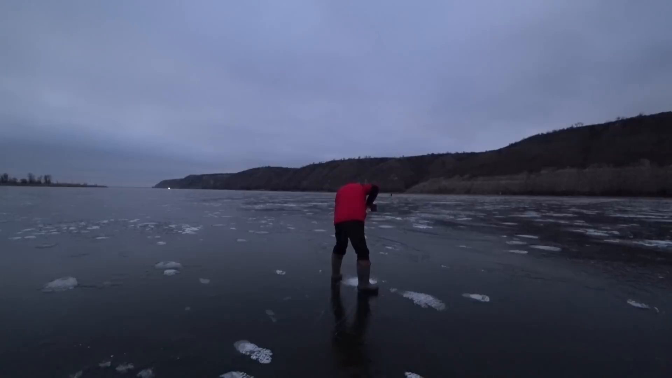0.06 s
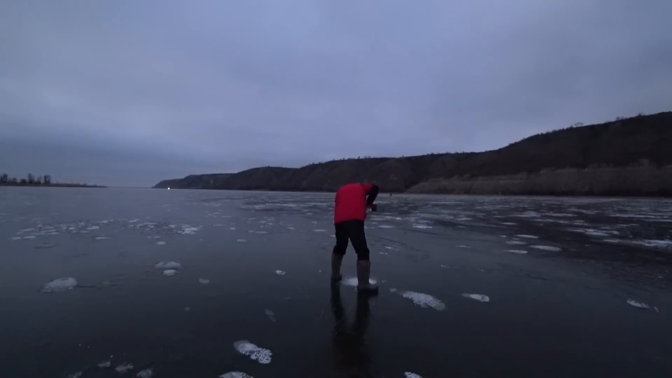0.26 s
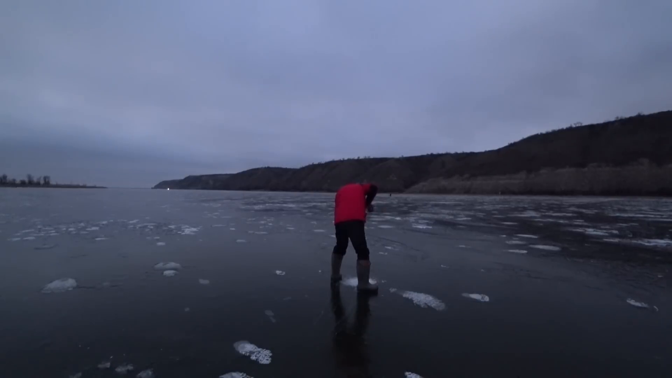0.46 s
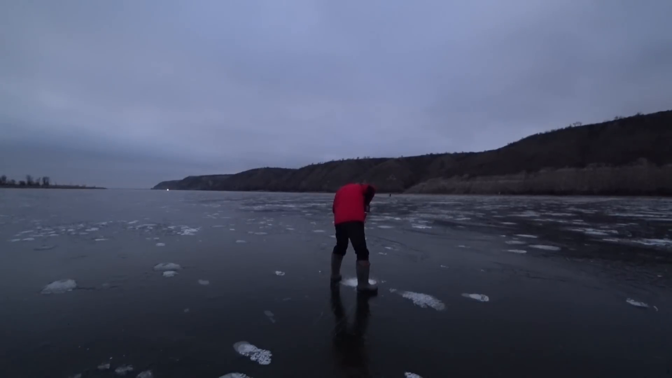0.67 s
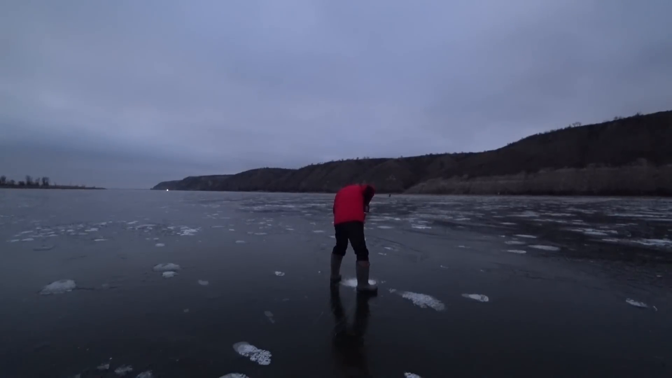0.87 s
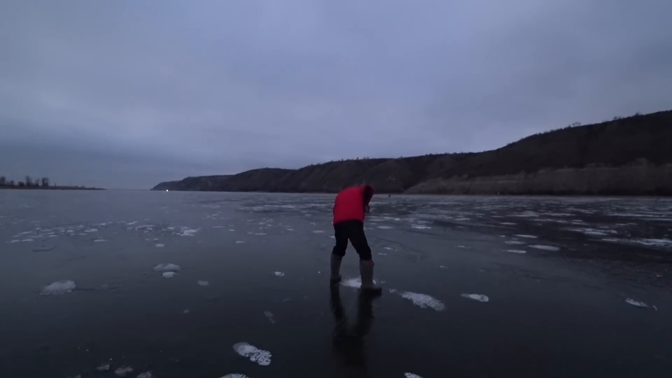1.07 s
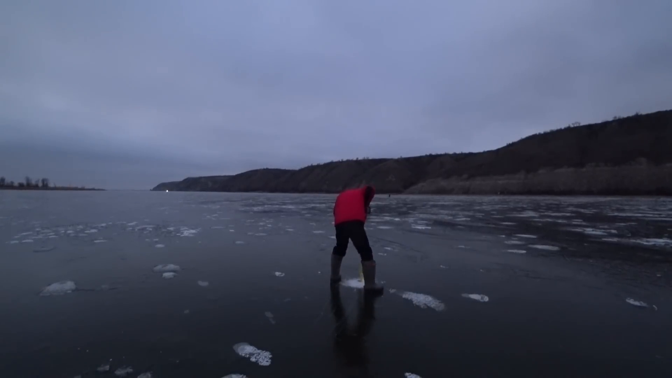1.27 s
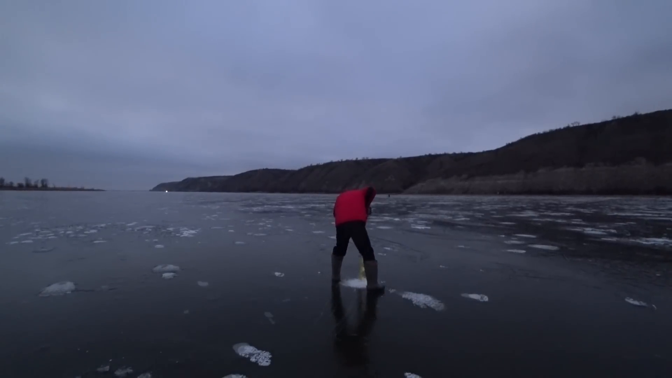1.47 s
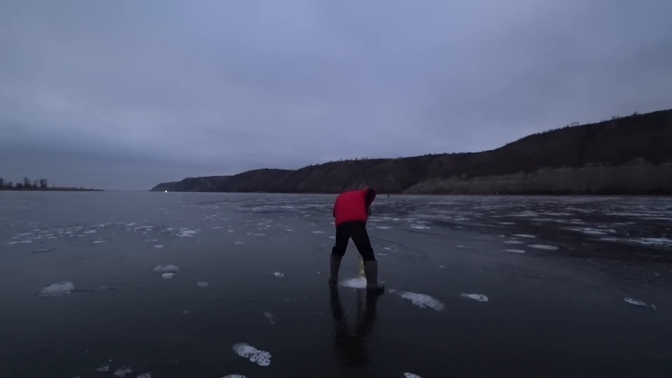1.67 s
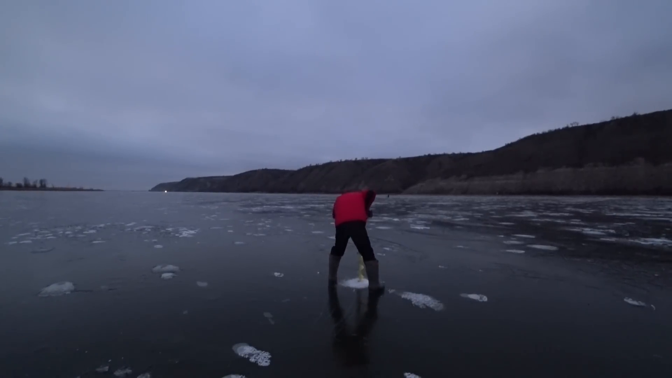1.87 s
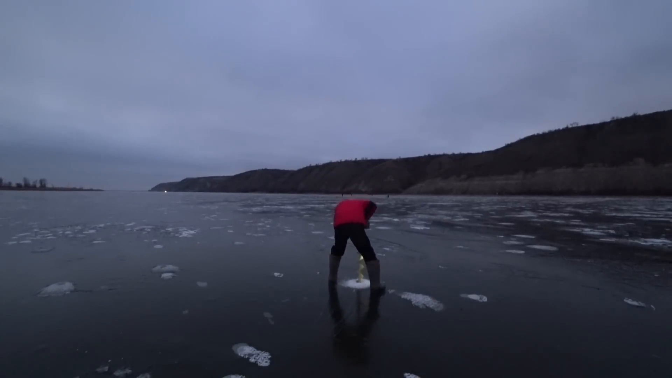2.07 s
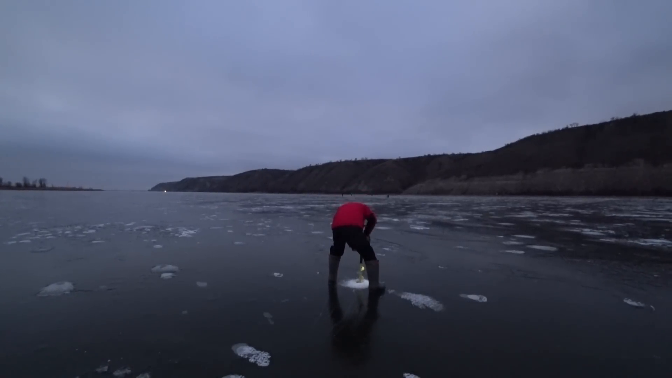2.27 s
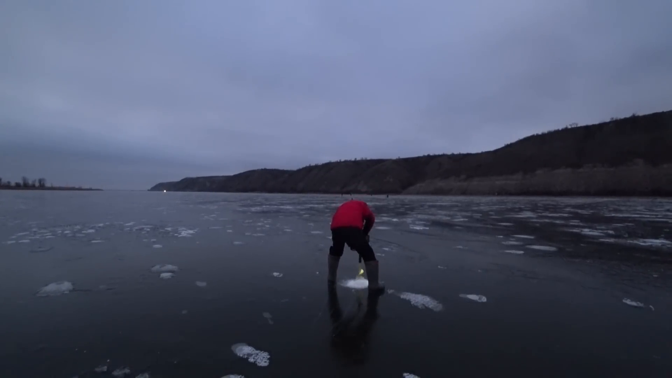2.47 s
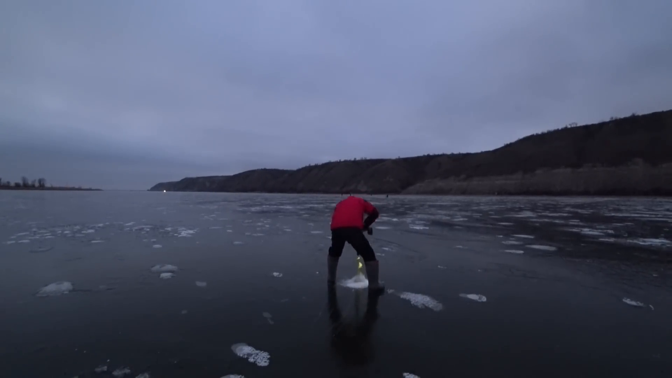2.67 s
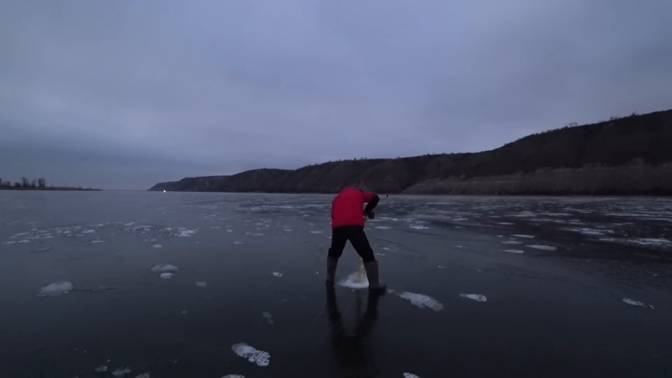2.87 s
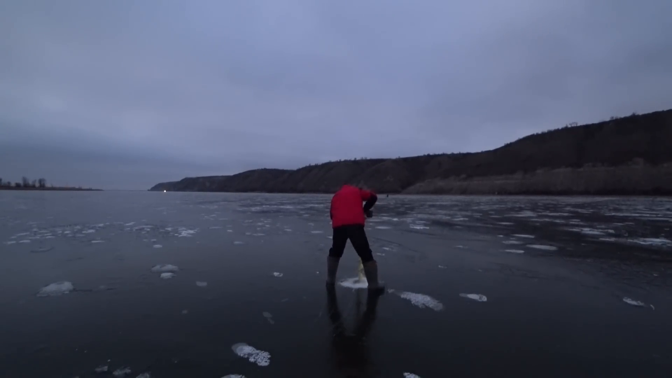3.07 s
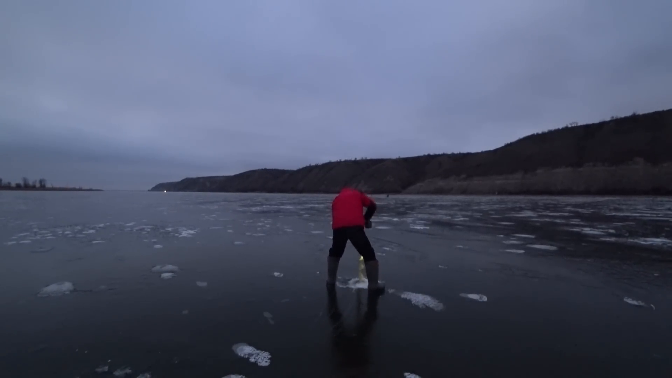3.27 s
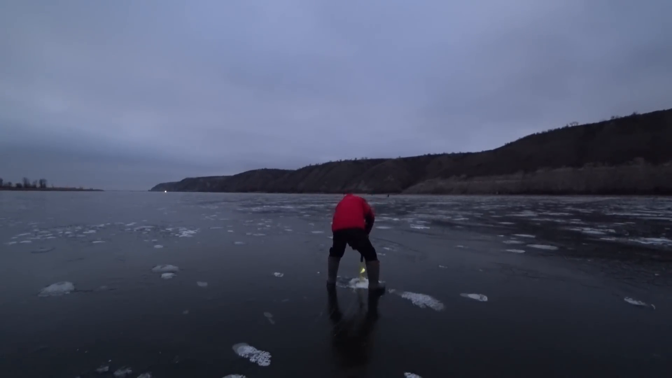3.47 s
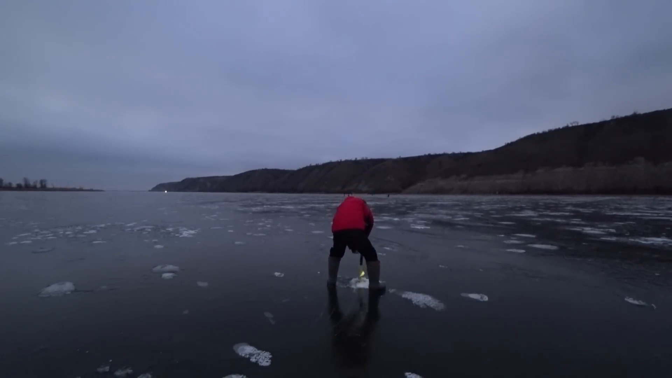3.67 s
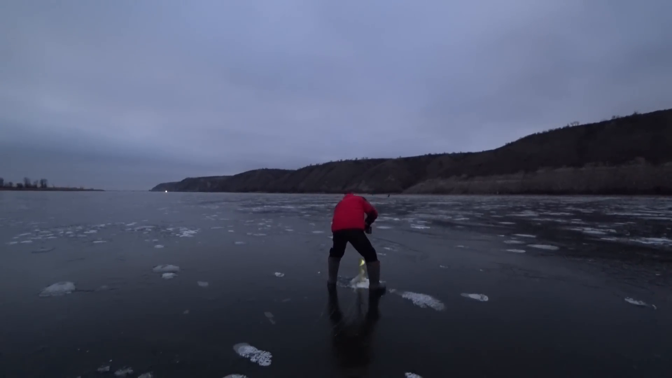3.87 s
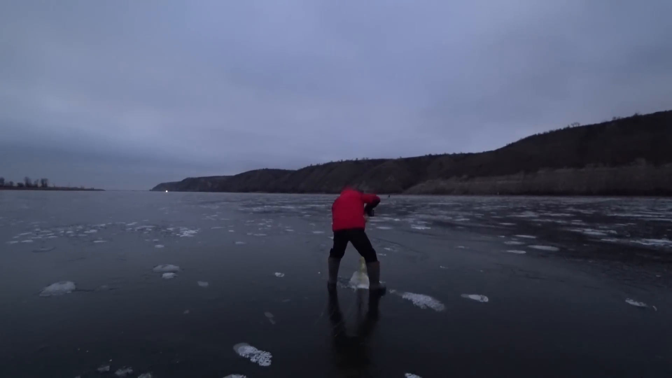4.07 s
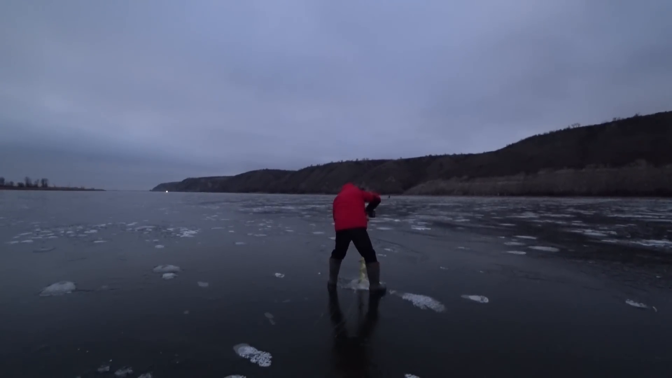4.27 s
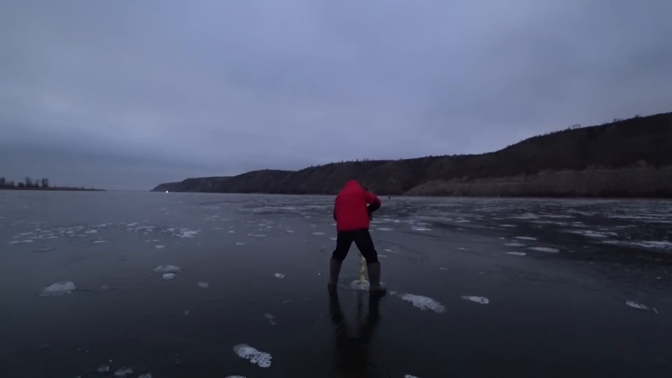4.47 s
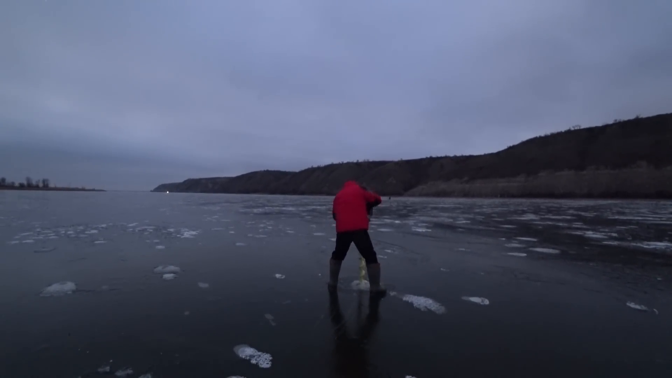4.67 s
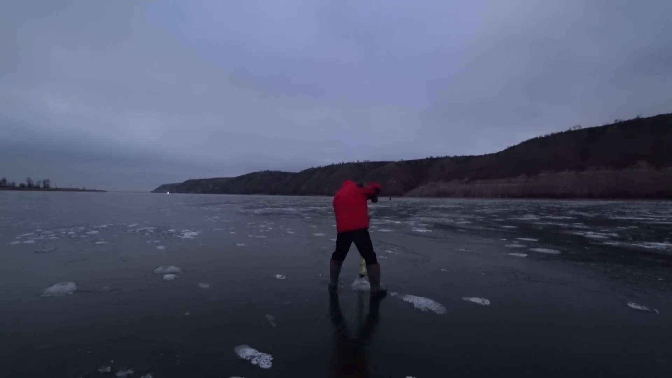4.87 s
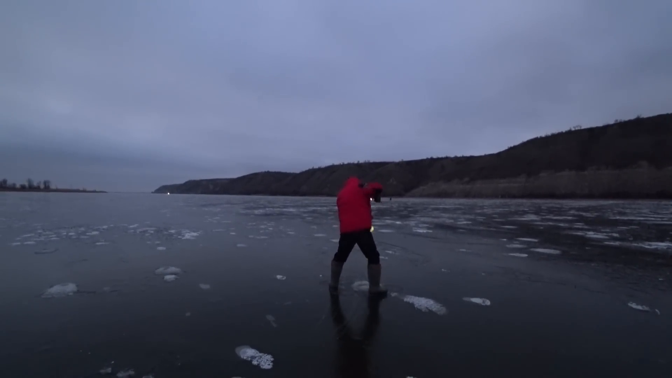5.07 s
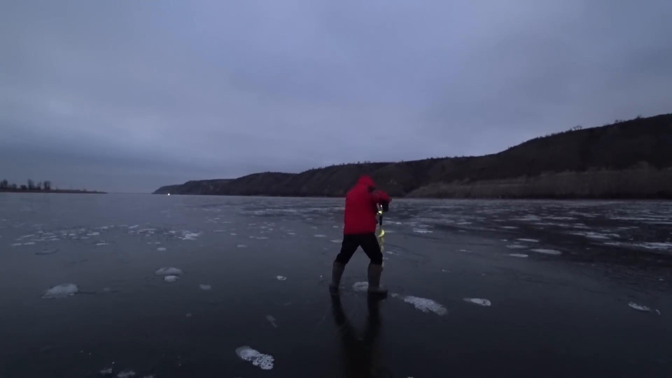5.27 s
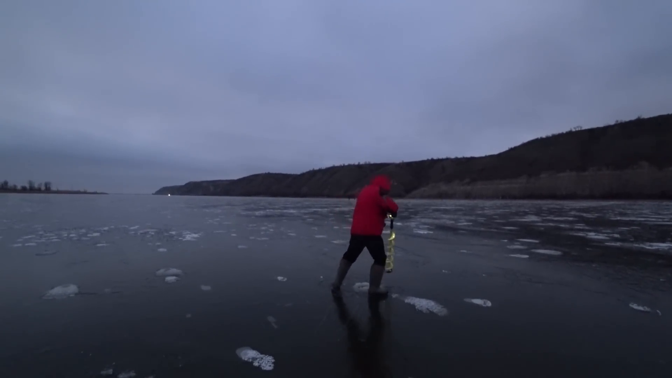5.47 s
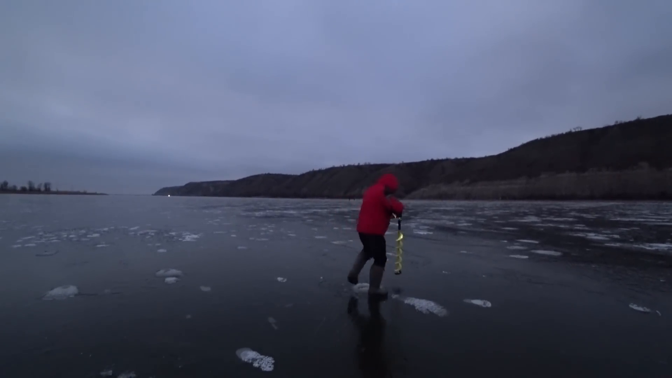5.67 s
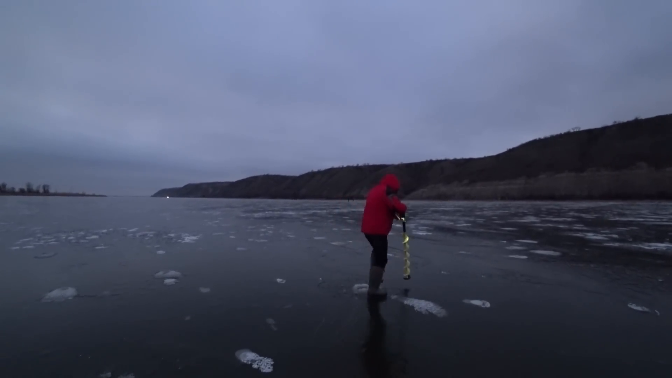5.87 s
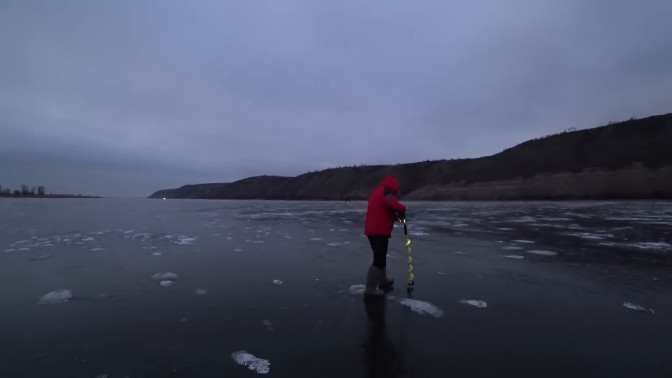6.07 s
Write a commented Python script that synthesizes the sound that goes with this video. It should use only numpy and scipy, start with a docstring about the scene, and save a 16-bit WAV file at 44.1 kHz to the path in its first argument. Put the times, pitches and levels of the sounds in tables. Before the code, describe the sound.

A hand auger scrapes, squeals and crunches through thick ice, then breaks into gulping water and slush, outdoors in still air.

```python
"""A hand auger (a big spiral drill) bores through thick river ice, a few metres away in still open air.
First the blades shave with a gritty hiss, whistling and squealing as they stick and slip, while boots
and the shaft knock. From about 2.4 s the blades catch and crack out chips, the spiral stirs slush, and
water gulps in the hole as the auger breaks through. It is pulled up at about 4.6 s. Afterwards drips
and boots tick faintly on the ice and a jacket rustles."""
import sys
import numpy as np
from scipy import signal
from scipy.fft import rfft, irfft, next_fast_len
from scipy.io import wavfile
from scipy.ndimage import uniform_filter1d

SR = 44100
rng = np.random.default_rng(int(sys.argv[2]) if len(sys.argv) > 2 else 0)


def unload_wav(signal):
    """Save mono or channel-first audio to the path in sys.argv[1] as 16-bit WAV at rate SR, clipped to [-1, 1]."""
    wavfile.write(
        sys.argv[1],
        SR,
        np.round(np.clip(np.atleast_2d(signal).T, -1, 1) * 32767).astype(np.int16),
    )


N = 270323
TIME = np.arange(N) / SR


def amp(db):
    """Turns decibels into a number to multiply by."""
    return 10 ** (np.asarray(db) / 20)


def unit(x):
    """Scales a signal to an average (rms) size of one."""
    return x / np.sqrt(np.mean(x ** 2) + 1e-20)


def level_at(points, hz):
    """Reads levels between (pitch_hz, level_db) points, on a musical pitch scale."""
    pitches, levels = np.transpose(points)
    return np.interp(np.log(hz + 1), np.log(pitches + 1), levels)


def follow(rows):
    """Joins rows of (time_s, values...) into one curve for each value."""
    times, *columns = np.transpose(rows)
    return [np.interp(TIME, times, column) for column in columns]


def during(rows):
    """One from the first row's time to the last, zero outside, with soft edges."""
    return uniform_filter1d(1. * ((TIME >= rows[0][0]) & (TIME <= rows[-1][0])), size=400)


def swell(start_s, rise_s, length_s, fade_s):
    """Loudness of one movement: it builds up, holds, and dies away when its length is over."""
    t = TIME - start_s
    return np.clip(t / rise_s, 0, 1) ** 1.36 * np.exp(-np.maximum(t - length_s, 0) / fade_s)


def together(levels):
    """Adds the levels of overlapping movements by power."""
    return np.sqrt(sum(level ** 2 for level in levels))


def add(mix, start_s, sound):
    """Mixes a sound in at a given time."""
    part = mix[max(round(start_s * SR), 0):][:len(sound)]
    part += sound[:len(part)]


def band(x, hz, kind, order=3):
    """Keeps the low, the high or a middle band of a sound."""
    return signal.sosfilt(signal.butter(order, hz, kind, fs=SR, output="sos"), x)


def colour(x, points):
    """Shapes the tone by (pitch_hz, level_db) points; clicks keep their sharp front."""
    log_gain = np.log(amp(level_at(points, abs(np.fft.fftfreq(4096, 1 / SR)))))
    response = np.exp(np.conj(signal.hilbert(log_gain)))  # rings only after a click, never before
    taps = np.fft.ifft(response).real
    return signal.oaconvolve(x, taps[:len(taps) // 2])[:N]


def resonate(x, hz, width_hz):
    """Makes a sound ring at a steady or sliding pitch; a narrower width rings longer."""
    turn = np.exp(2j * np.pi * np.cumsum(hz * np.ones(len(x))) / SR)
    decay = np.exp(-np.pi * width_hz / SR)
    return 2 * (turn * signal.lfilter([1 - decay], [1, -decay], x / turn)).real


def wander(rate_hz):
    """A smooth random wobble, mostly slower than the given rate."""
    size = next_fast_len(N, real=True)
    hz = np.fft.rfftfreq(size, 1 / SR)
    spectrum = rfft(rng.standard_normal(size)) * np.exp(-(hz / rate_hz) ** 2)
    return unit(irfft(spectrum, size)[:N])


def grit(per_s, spread_db):
    """Tiny cracks: random clicks, a few louder than the rest."""
    size = amp(spread_db * np.minimum(rng.exponential(1, N), 4))
    return unit(size * rng.choice([-1, 1], N) * (rng.random(N) < per_s / SR))


def patchy(x, depth_db, size=1024):
    """Every flake of ice favours its own few pitches for a moment."""
    frames = dict(nperseg=size, noverlap=size * 3 // 4)
    spectra = signal.stft(x, **frames)[2]
    patches = uniform_filter1d(rng.standard_normal(spectra.shape), size=4, axis=0)  # smooth over pitch
    patches = unit(uniform_filter1d(patches, size=5, axis=1))  # and over time
    return unit(signal.istft(spectra * amp(depth_db * patches), **frames)[1][:N])


def air(level_db=-54.5, left_db=-1.7):
    """The steady hush of the open river, wide and a little to the right."""
    # tone of the hush: pitch_hz, level_db
    hush_tone = [(15, -33), (25, -18), (108, -10), (293, 2), (754, 0), (962, 2), (1480, 0), (1790, -7.5),
                 (2160, -7.5), (3250, -12), (6920, -7.5), (9320, -20.5), (12200, -16), (14800, -25),
                 (16000, -65)]
    # how much the two ears differ: pitch_hz, side_level_db
    width = [(100, -21), (1200, -1), (1900, 3), (3500, -3), (7000, -2.5), (13000, -7)]
    mid, side = (unit(colour(rng.standard_normal(N), hush_tone)) for _ in range(2))
    side = colour(side, width)
    return amp(level_db) * np.array([amp(left_db) * (mid + side), mid - side])


def crank_pressure():
    """Each push on the crank swells two loudness curves: hiss and low grinding."""
    # pushes: start_s, rise_s, length_s, fade_s, hiss_db, grind_db
    strokes = [(-.03, 0.076, 0.1, 0.011, -26, -31), (0.086, 0.16, 0.17, .02, -50.5, -45),
               (0.238, 0.033, .17, 0.054, -30.5, -33), (0.51, 0.092, 0.095, 0.051, -41.5, -37),
               (0.675, 0.1, 0.091, 0.011, -37, -42), (0.778, 0.022, 0.025, 0.038, -37, -43),
               (1.025, 0.095, 0.95, 0.013, -23, -32.5), (1.972, 0.043, 0.076, 0.023, -35, -42.5),
               (2.038, 0.065, .38, 0.033, -43.5, -53.5), (2.414, 0.063, 0.057, 0.016, -37, -39)]
    return together(amp([[hiss_db], [grind_db]]) * swell(*timing)
                    for *timing, hiss_db, grind_db in strokes)


def auger_ring(x, ring_db):
    """The steel spiral and the hole ring along with the ice."""
    # notes of the auger in its hole: pitch_hz, width_hz, level_db
    notes = [(582, 23, 4.5), (830, 110, -6.5), (1601, 41, -6), (2044, 24, -14), (2900, 160, -15),
             (4350, 51, -39), (5660, 48, -0.5)]
    return x + amp(ring_db) * sum(amp(db) * resonate(x, hz, width_hz) for hz, width_hz, db in notes)


def rubbing(levels, grains, tone, hiss_db, grind_db):
    """Grains are heard as a hiss from the cutting edge and a low grinding from the ice sheet."""
    hiss_level, grind_level = levels
    sound = colour(grains, tone)
    hiss = unit(band(sound, 1226, "high", order=4)) * hiss_level * amp(hiss_db)
    grind = unit(band(sound, 870, "low", order=4)) * grind_level * amp(grind_db)
    return hiss + grind


def shaving(levels):
    """Tiny cracks bunch up as the blades stick and slip; a harder bite sounds brighter."""
    # tone of shaved ice: pitch_hz, level_db
    shave_tone = [(47, -101), (80, -44.5), (369, -22), (563, -7.5), (718, -21), (917, 1.5), (1280, -1),
                  (1600, -1), (1780, -1.5), (2970, 0), (3540, -2.5), (5640, -3.5), (6740, -9),
                  (11200, -17.5), (16000, -29.5)]
    # how sharply the blades bite: time_s, treble_boost_db
    bite = [(0, 16.5), (.08, -18), (.27, -5), (1.1, -11.5), (1.75, -6), (1.85, -0.5), (2.05, 0.5)]
    cracks = patchy(grit(per_s=7000, spread_db=1.5), depth_db=2.5) * amp(0.93 * wander(100))
    treble = signal.filtfilt(*signal.butter(2, 9000, "high", fs=SR), cracks)
    cracks = cracks + (amp(follow(bite)[0]) - 1) * treble
    return rubbing(levels, auger_ring(cracks, ring_db=-1), shave_tone, hiss_db=-0.4, grind_db=-1.5)


def chatter(hiss_level, trim_db=-5):
    """Uneven sticking and slipping makes a wavering whistle that slides with the crank's speed."""
    # the blade's pitch, one list for each hard stroke: time_s, pitch_hz
    slides = [
        [(0, 6700), (.025, 6050), (.048, 4950), (.085, 4350)],
        [(.26, 4000), (.31, 4350), (.375, 5500), (.405, 5400), (.435, 4100)],
        [(1.04, 4500), (1.12, 5400), (1.19, 5100), (1.27, 4650), (1.37, 4520), (1.47, 4880), (1.58, 4560),
         (1.68, 4880), (1.97, 4450)],
        [(1.985, 3400), (2.01, 4300), (2.06, 4850)],
        [(2.435, 1900), (2.455, 1500), (2.49, 1150)],
    ]
    # strength of each slide, relative to the hiss: level_db
    slide_levels = [-1.5, -0.5, -6.5, -1, 1]
    # the whistle's three tones: pitch_multiple, level_db
    tones = [(.66, -2.5), (1, 0), (1.48, -13)]
    hz = follow(sum(slides, []))[0]
    cycles = np.cumsum(hz * (1 + .01 * wander(150))) / SR
    whistle = sum(amp(db + 3.5 * wander(90)) * np.sin(2 * np.pi * multiple * cycles)
                  for multiple, db in tones)
    gate = sum(amp(db + trim_db) * during(slide) for db, slide in zip(slide_levels, slides))
    return unit(whistle) * hiss_level * gate


def thumps(rows, trim_db, glide_per_s, rise_s, ring_s, burst_db):
    """Short notes, each wrapped in a burst of noise and fading by 60 dB in ring_s."""
    out, t = np.zeros(N), np.arange(SR // 5) / SR
    attack = np.sin(np.pi / 2 * np.minimum(t / rise_s, 1)) ** 2
    shape = attack * np.exp(-np.log(1000) * t / ring_s)
    for start_s, db, hz in rows:
        note = np.sin(2 * np.pi * np.cumsum(hz * (1 + glide_per_s * t)) / SR)
        burst = unit(band(rng.standard_normal(len(t)), [0.65 * hz, 2.0 * hz], "band"))
        add(out, start_s, amp(db + trim_db) * shape * (note + amp(burst_db) * burst))
    return out


def knocks():
    """Boots shift and the shaft knocks in the hole."""
    # knocks: start_s, level_db, pitch_hz
    hits = [(0.138, -35, 547), (0.26, -23.5, 917), (0.403, -26.5, 912), (0.455, -30, 950),
            (0.464, -30.5, 400), (0.517, -28, 1010), (0.612, -26, 876), (1.096, -16, 1066),
            (1.922, -18, 1012), (2.514, -18.5, 955), (2.61, -24, 1000)]
    return thumps(hits, trim_db=-2, glide_per_s=0, rise_s=0.0037, ring_s=0.092, burst_db=-3)


def ticks(rise_s=0.00078, fade_s=0.0054, noise_db=-16, trim_db=-3):
    """Drops and grains land on the ice with short dry spits."""
    # drips and boot grit: start_s, level_db, pitch_hz
    drops = [(0.2029, -34.5, 5760), (4.5181, -29, 3100), (4.9766, -32, 2850), (5.0115, -36, 4160),
             (5.0539, -41, 2590), (5.0863, -35, 3230), (5.1564, -36.5, 4790), (5.2091, -35, 3680),
             (5.4146, -35, 2920), (5.6014, -26.5, 2720), (5.6264, -34, 2130), (5.7344, -35.5, 3900),
             (5.7618, -34, 5200), (6.1065, -39, 6100)]
    out, t = np.zeros(N), np.arange(SR // 20) / SR
    for start_s, db, hz in drops:
        spit = rng.standard_normal(len(t)) * np.minimum(t / rise_s, 1) * np.exp(-t / fade_s)
        tick = band(resonate(spit, hz, width_hz=800) + amp(noise_db) * spit, [1500, 9000], "band", 2)
        add(out, start_s, amp(db + trim_db) * tick / abs(tick).max())
    return out


def squeals(trim_db=-3):
    """A skating blade sticks and slips almost regularly, giving a thin, raspy stack of tones."""
    # a blade skating without biting, one list per squeal: time_s, pitch_hz, level_db
    skids = [
        [(.7, 690, -54), (.76, 700, -49), (.83, 775, -40), (.88, 744, -46.5), (.98, 1010, -54)],
        [(2.08, 645, -60), (2.16, 679, -40.5), (2.25, 697, -45), (2.32, 697, -39.5), (2.39, 694, -43),
         (2.43, 697, -48)],
    ]
    # tones, one list per squeal: pitch_multiple, level_db
    stacks = [
        [(1, 0), (2, -6)],
        [(1, -11), (2, -7), (4, -2), (5.4, -12), (6.45, -8), (8, 0), (9.6, -14)],
    ]
    out = np.zeros(N)
    for skid, stack in zip(skids, stacks):
        gate = during(skid)
        sounding = gate > 1e-6
        hz, db = (curve[sounding] for curve in follow(skid))
        noise = rng.standard_normal(len(hz))
        tones = sum(amp(tone_db) * unit(resonate(resonate(noise, multiple * hz, 35), multiple * hz, 70))
                    for multiple, tone_db in stack)
        out[sounding] += unit(tones) * amp(db + trim_db) * gate[sounding]
    return out


def crunches(hold_s=0.0064, fade_s=0.0077, crumbs_s=0.019, bass_rise_s=0.0046, trim_db=-13):
    """Each chip is a ringing rush of cracks, then falling crumbs; the ice sheet answers more slowly."""
    # tone of breaking ice: pitch_hz, level_db
    chip_tone = [(47, -24), (80, -35), (361, -16.5), (493, 9), (615, -1), (917, 1.5), (1670, -4.5),
                 (2130, -1), (2380, -3), (2780, -2.5), (5640, -4), (7200, -5), (11700, -14), (16000, -27)]
    # chips breaking out: start_s, level_db, treble_db, pitch_hz
    chips = [(2.4278, -22.5, -24, 3640), (2.4998, -21.5, -19, 1270), (2.513, -14.5, -14, 1270),
             (2.525, -21.5, -17, 1900), (2.5547, -19, -13, 1260), (2.5776, -11.5, -16.5, 1210),
             (2.6074, -26.5, -12, 1520), (2.6678, -19, -14.5, 3530), (2.7232, -14, -25, 3450),
             (2.7463, -24, -7, 3670), (2.7553, -13.5, -23, 1450), (2.808, -16.5, -10, 3030),
             (2.8215, -11, -18, 1190), (2.851, -9, -17, 2150), (2.8855, -9, -17, 2200),
             (2.9183, -8, -15, 2380), (2.9532, -10, -13, 3430), (2.969, -13.5, -32, 2130),
             (2.9794, -13, -21, 1490), (2.992, -16, -18, 4530), (3.2483, -20, -15.5, 2380),
             (3.292, -25, -6.5, 2370), (3.3338, -13.5, -12, 6200), (3.367, -14.5, -20, 3160),
             (3.3855, -8, -12.5, 2080), (3.411, -13.5, -16, 2170), (3.4227, -11.5, -22, 2630),
             (3.457, -18.5, -10, 2350), (3.4918, -6, -11, 1640), (3.5124, -17, -16, 1610),
             (3.5224, -13, -21, 1660), (3.5518, -13.5, -21, 2260), (3.771, -22, -15, 4000),
             (3.8194, -12.5, -10.5, 3500), (3.8752, -10.5, -12, 2540), (3.933, -13, -12.5, 1390),
             (3.978, -9, -16, 2710), (4.011, -14.5, -9.5, 2100), (4.0284, -9, -16.5, 2020),
             (4.1091, -13, -12.5, 6400), (4.1578, -12, -20, 3100), (4.7077, -16, -36, 2160),
             (4.791, -16.5, -38, 2180)]
    cracks = patchy(grit(per_s=5500, spread_db=1.5), depth_db=3)
    cracks = colour(auger_ring(cracks, ring_db=1.5), chip_tone)
    low = band(cracks, [120, 850], "band")
    mid = band(cracks, [1000, 6000], "band")
    high = band(cracks, 8500, "high")
    out, t = np.zeros(N), np.arange(SR // 8) / SR
    attack = np.minimum(t / 0.0035, 1)
    crumbs = amp(-23) * np.exp(-t / crumbs_s)
    shape = attack * (np.exp(-np.maximum(t - hold_s, 0) / fade_s) + crumbs)
    bass_shape = t * np.exp(-t / bass_rise_s)
    for start_s, db, treble_db, hz in chips:
        first = round(start_s * SR)
        span = slice(first, first + len(t))
        bass, body, treble = unit(low[span] * bass_shape), unit(mid[span] * shape), unit(high[span] * shape)
        ring = unit(resonate(body, hz, width_hz=140))
        chip = body + amp(treble_db + 6) * treble + amp(-15) * bass + amp(-7) * ring
        add(out, start_s, amp(db + trim_db) * np.sqrt(np.mean(shape ** 2)) * chip)
    return out


def slush(rise_s=0.042, lift_at_s=4.6):
    """Loose wet chips tumble round the spiral; the narrow hole lets out no deep bass."""
    # tone of slush: pitch_hz, level_db
    slush_tone = [(47, -69), (80, -44), (222, 0.5), (331, -15.5), (461, 0), (687, -4.5), (917, 4.5),
                  (1170, -2.5), (1530, -2), (1950, -3), (5640, -7), (11700, -23.5), (16000, -31)]
    # turns of the spiral: start_s, length_s, hiss_db, churn_db
    stirs = [(2.52, 0.074, -34, -36), (2.685, 0.32, -33, -40.5), (3.032, .12, -33, -43),
             (3.252, 0.35, -34.5, -41), (3.707, 0.056, -35, -38), (3.794, 0.23, -36, -36.5),
             (4.109, 0.1, -33, -45), (4.291, 0.094, -37, -61), (4.4, 0.05, -44.5, -48.5),
             (4.638, 0.17, -34.5, -35.5)]
    grains = patchy(grit(per_s=5000, spread_db=3.5), depth_db=3.5, size=512) * amp(1.4 * wander(85))
    grains = band(grains, 350, "high", order=4)
    levels = []
    for start_s, length_s, hiss_db, churn_db in stirs:
        fade_s = 0.1 if start_s < lift_at_s else 0.023  # slush stops quickly once the auger is lifted
        levels.append(amp([[hiss_db], [churn_db]]) * swell(start_s, rise_s, length_s, fade_s))
    return rubbing(together(levels), grains, slush_tone, hiss_db=-3, grind_db=-2)


def jolts(rise_s=0.003, fade_s=0.039, trim_db=0.5):
    """A jolt spreads through the ice sheet as a short dull rumble."""
    # the shaft jolting the ice: start_s, level_db
    hits = [(2.556, -48), (2.609, -46), (2.824, -41), (3.419, -54), (3.493, -49.5), (3.818, -46.5)]
    out, t = np.zeros(N), np.arange(SR // 5) / SR
    shape = np.minimum(t / rise_s, 1) * np.exp(-t / fade_s)
    for start_s, db in hits:
        rumble = band(rng.standard_normal(len(t)), [170, 360], "band", order=2)
        add(out, start_s, amp(db + trim_db) * unit(rumble) * shape)
    return out


def gulps(upper_ratio=1.65):
    """Each gulp of water rings the two lowest notes of the hole."""
    # gulps: start_s, level_db, pitch_hz, upper_note_db (relative to the lower note)
    surges = [(2.722, -27.5, 474, -4), (2.825, -14.5, 517, -1.5), (2.889, -24, 454, -6),
              (2.924, -24, 504, -2.5), (2.975, -27, 394, -8), (3.251, -26, 592, -14),
              (3.525, -22.5, 487, -23), (3.822, -23.5, 494, 2.5), (4.153, -21.5, 418, -0.5),
              (4.172, -24.5, 454, 1.5), (4.195, -32.5, 441, -2), (4.463, -36, 536, -15),
              (4.71, -23, 484, 4.5), (4.727, -28.5, 456, 10.5), (4.746, -28, 458, 3),
              (4.785, -12, 494, -14), (4.817, -25.5, 467, -12)]
    lower = [(start_s, db, hz) for start_s, db, hz, _ in surges]
    upper = [(start_s, db + upper_db, hz * upper_ratio) for start_s, db, hz, upper_db in surges]
    notes = thumps(lower + upper, trim_db=3, glide_per_s=0.09, rise_s=0.0041, ring_s=0.078, burst_db=-10)
    return band(notes, 366, "high", order=6)


def rustle(rise_s=0.022, fade_s=0.062, trim_db=-4):
    """Cloth and grit crackle faintly with each movement."""
    # jacket and boots moving after the lift: start_s, length_s, level_db
    moves = [(4.914, .28, -51), (5.34, 0.066, -51), (5.552, 0.046, -45.5), (5.7, 0.057, -59),
             (5.998, 0.11, -58)]
    crackle = patchy(grit(per_s=1600, spread_db=3), depth_db=5, size=256)
    level = together(amp(db + trim_db) * swell(start_s, rise_s, length_s, fade_s)
                     for start_s, length_s, db in moves)
    return unit(band(crackle, [1700, 6000], "band", order=2)) * level


def outdoors(x, scatter_db=-19, wide_bass_db=-22, wide_treble_db=-24, echo_s=0.11):
    """The direct sound and a little scatter off the ice reach two close microphone openings."""
    # the two openings ring slightly differently: pitch_hz, width_hz, side_share
    openings = [(610, 770, 0.077), (1660, 280, 0.24), (6400, 250, 0.35), (10500, 1000, -0.32)]
    # lean to one side: pitch_hz, left_minus_right_db
    balance = [(100, -1.4), (600, -.9), (1400, -1.2), (3100, -1.1), (6800, -1.3), (14000, -.2)]
    t, freqs = np.arange(SR // 4) / SR, np.fft.rfftfreq(N, 1 / SR)
    tails = rng.standard_normal((2, len(t))) * np.exp(-np.log(1000) * t / echo_s)
    near, wide = (signal.oaconvolve(x, tail / np.linalg.norm(tail))[:N] for tail in tails)
    wide_bass = amp(wide_bass_db) * band(wide, 1800, "low", order=2)
    wide_treble = amp(wide_treble_db) * band(wide, 1400, "high", order=2)
    # mid is the same in both ears; side is added on the left and taken away on the right
    mid = rfft(x + amp(scatter_db) * near)
    side = mid * sum(1j * share / (1 + 2j * (freqs - hz) / width_hz) for hz, width_hz, share in openings)
    side = side + rfft(wide_bass + wide_treble)
    lean = amp(level_at(balance, freqs) / 2)
    return irfft(np.array([(mid + side) * lean, (mid - side) / lean]), N)


def scene():
    """Mixes the auger, the water and the small movements in the open air."""
    levels = crank_pressure()
    blades = shaving(levels) + chatter(hiss_level=levels[0]) + squeals() + crunches()
    bumps = knocks() + jolts()
    return outdoors(blades + slush() + gulps() + bumps + ticks() + rustle()) + air()


def record(dry):
    """Cuts off the very highest treble."""
    taps = signal.firwin(511, 16050, window=("kaiser", 9), fs=SR)
    return signal.oaconvolve(dry, taps[None], "same")


dry = scene()
out = record(dry)
unload_wav(out)
```